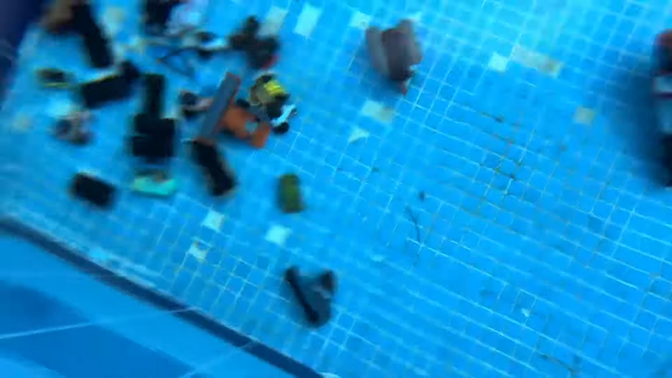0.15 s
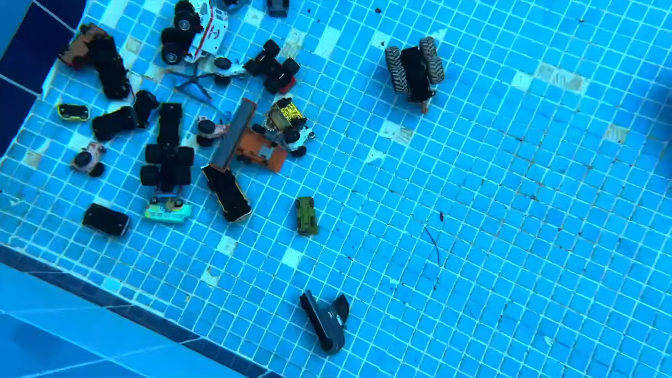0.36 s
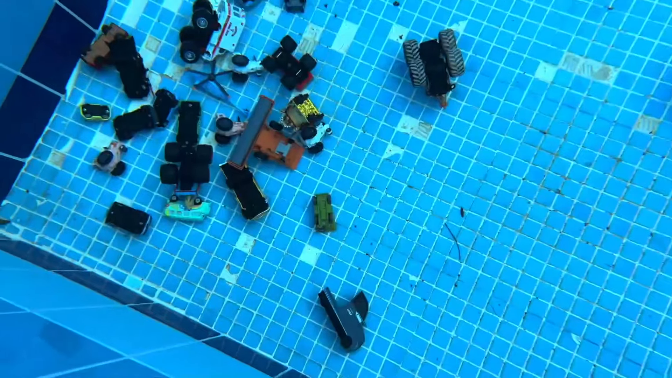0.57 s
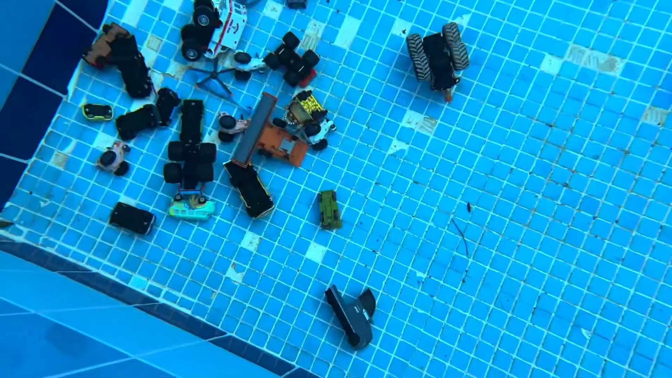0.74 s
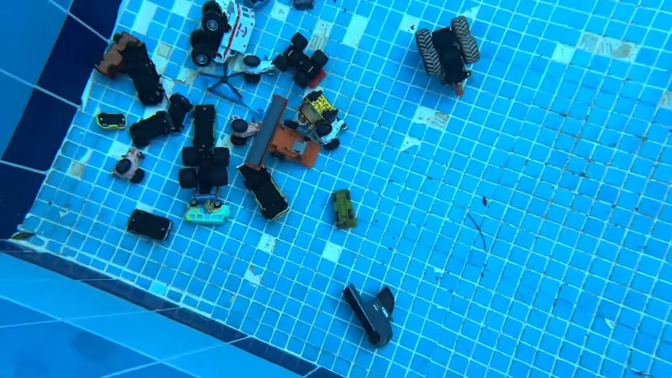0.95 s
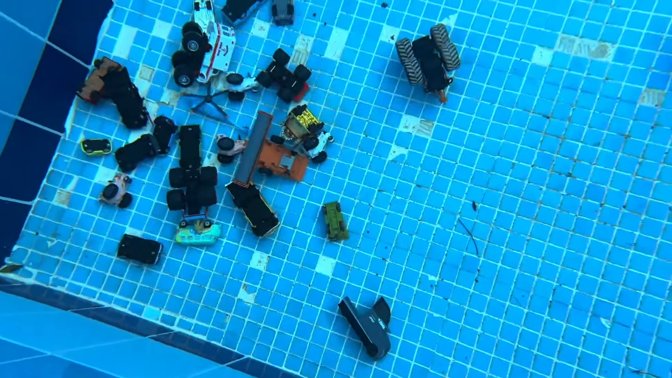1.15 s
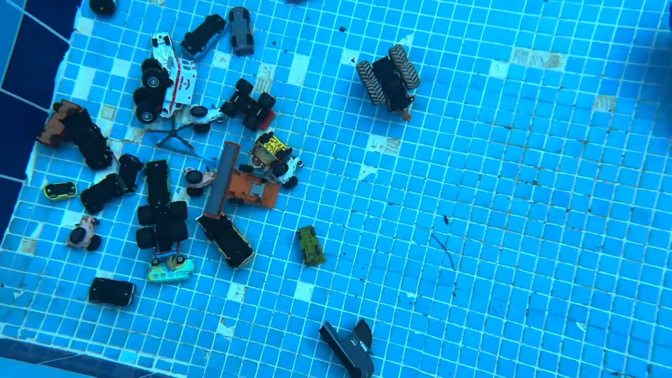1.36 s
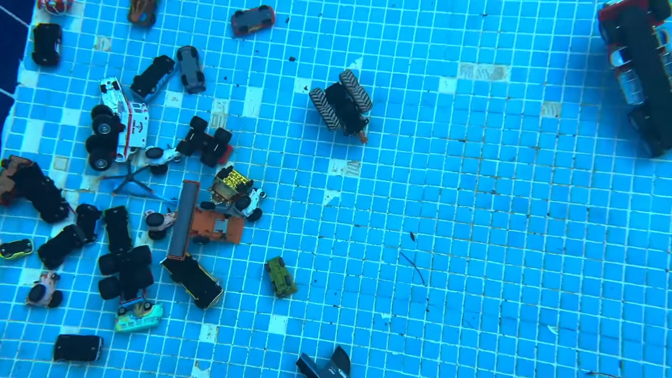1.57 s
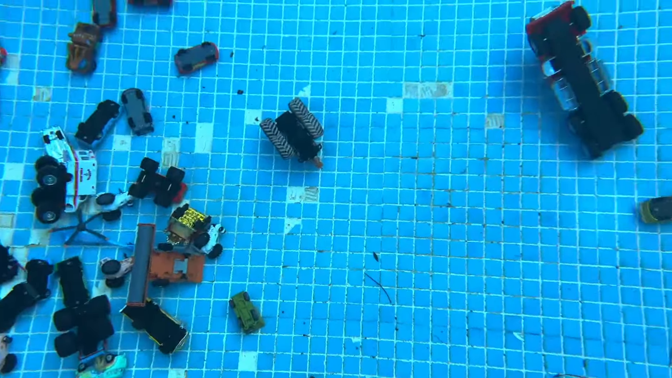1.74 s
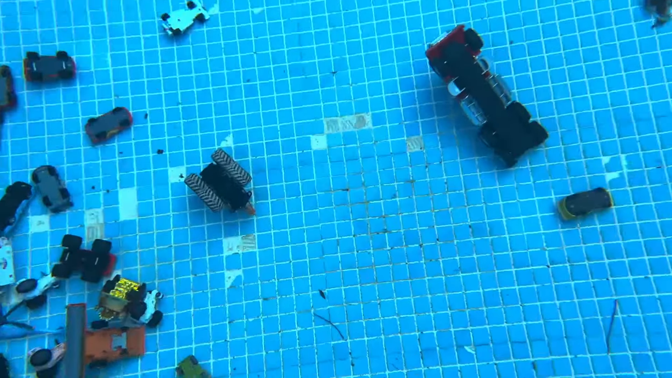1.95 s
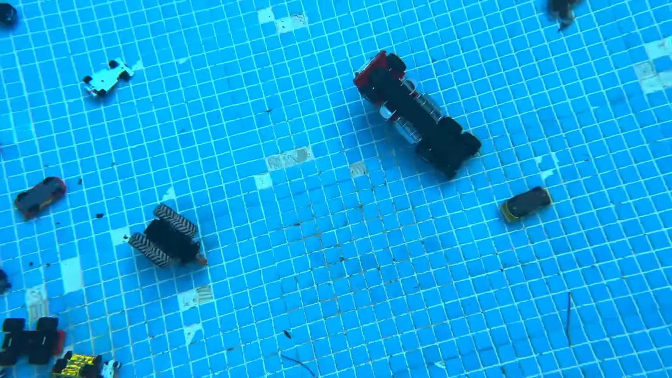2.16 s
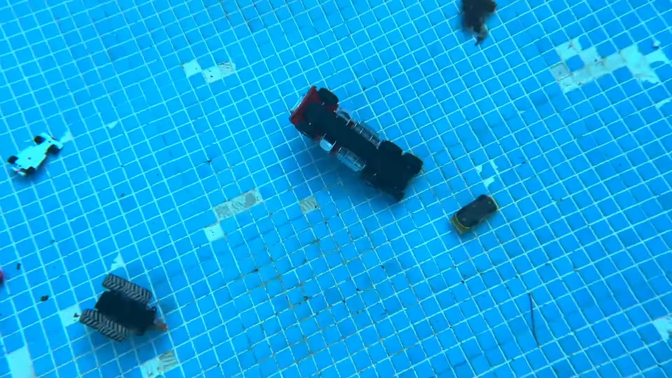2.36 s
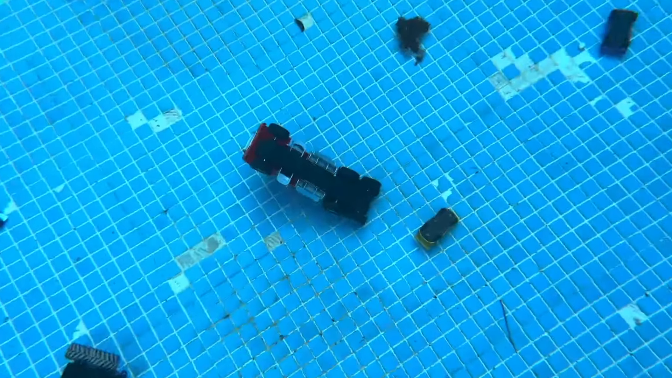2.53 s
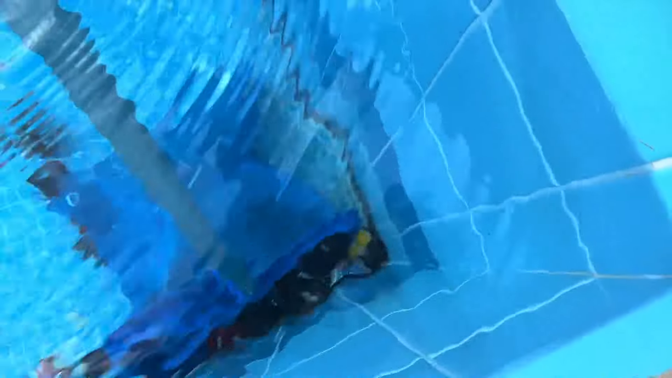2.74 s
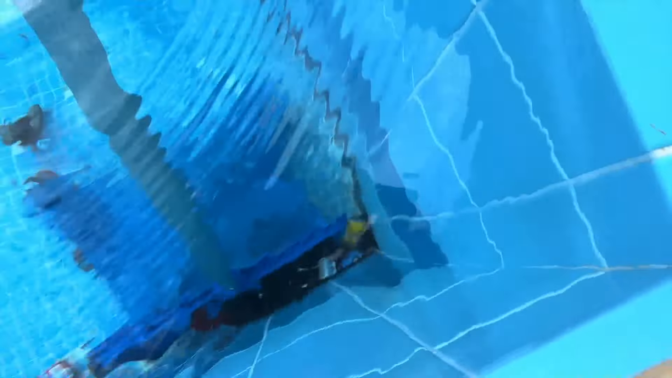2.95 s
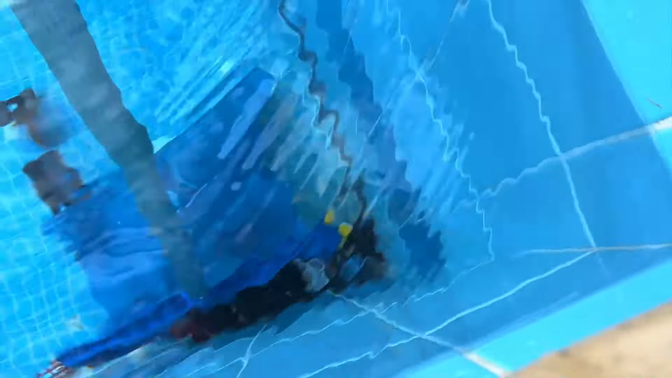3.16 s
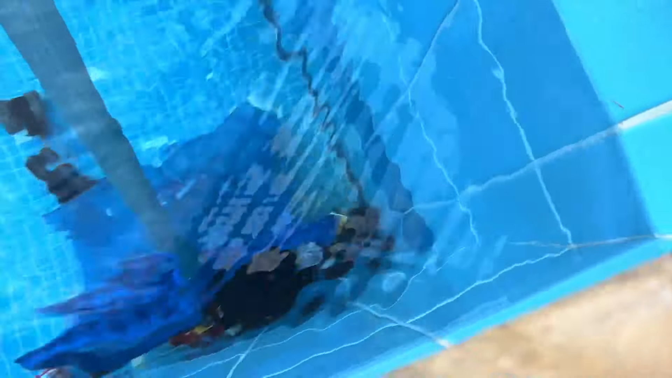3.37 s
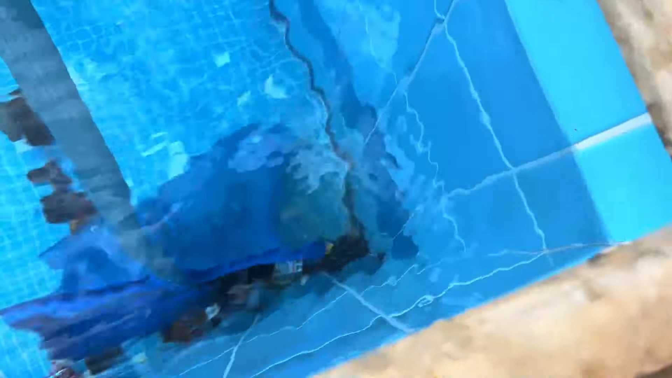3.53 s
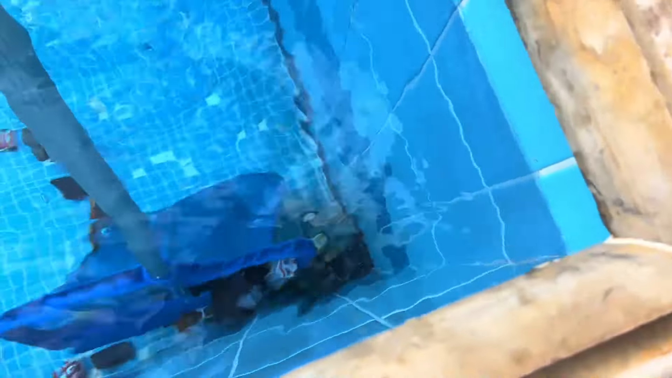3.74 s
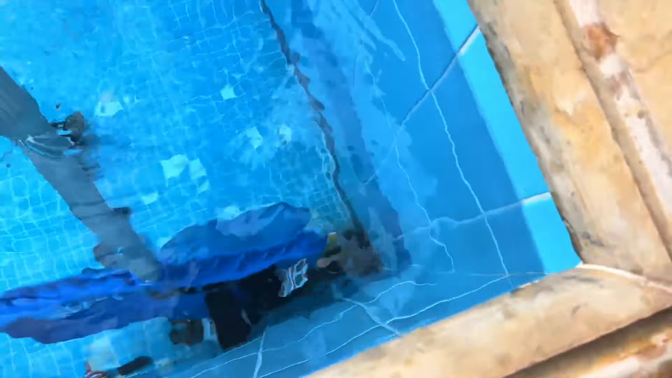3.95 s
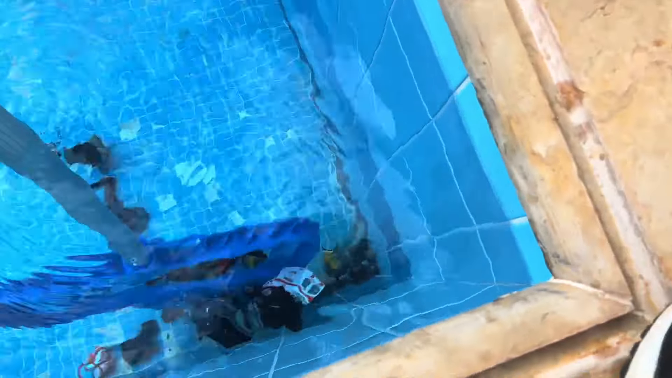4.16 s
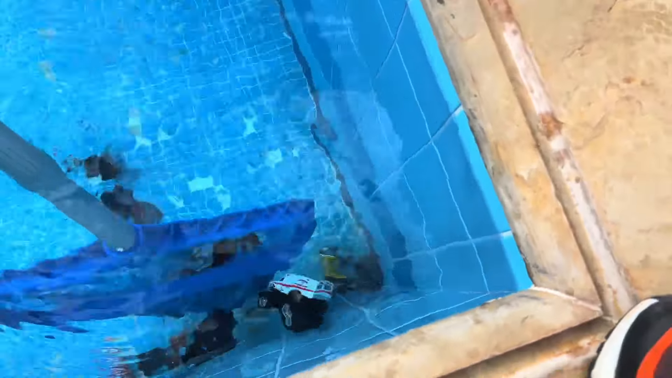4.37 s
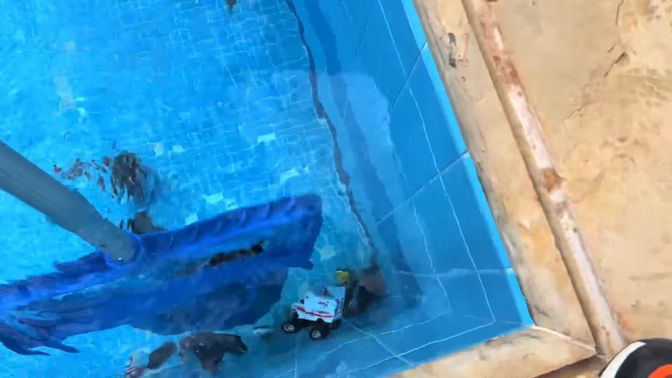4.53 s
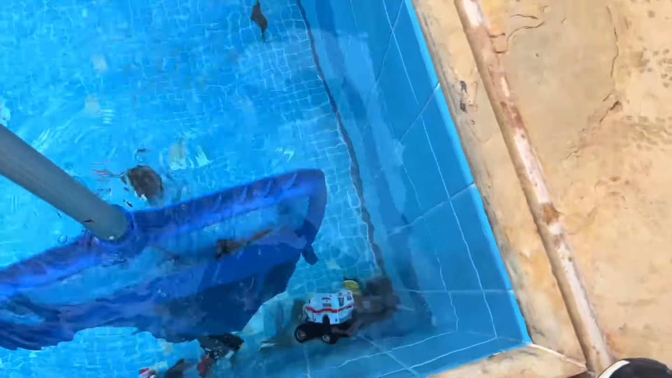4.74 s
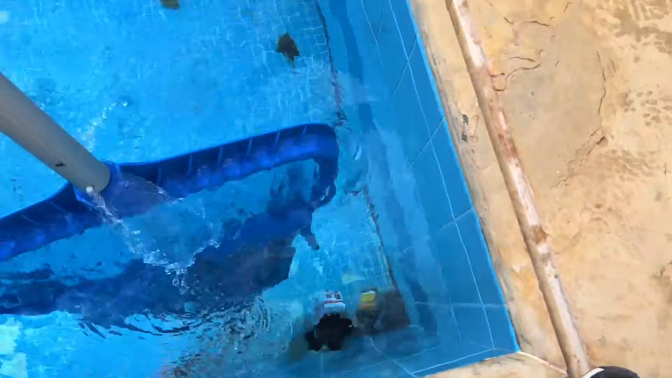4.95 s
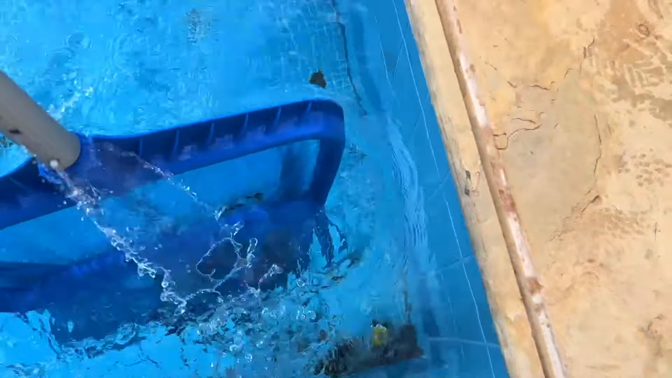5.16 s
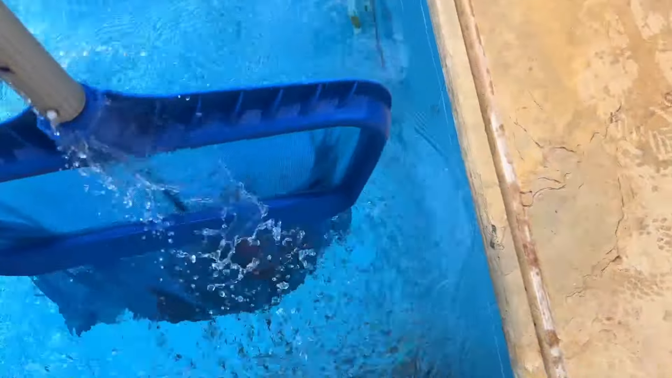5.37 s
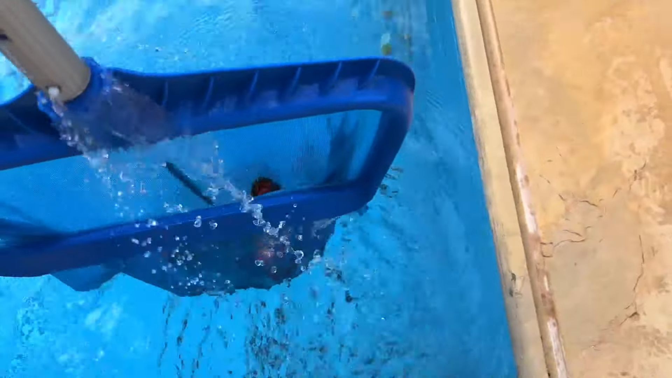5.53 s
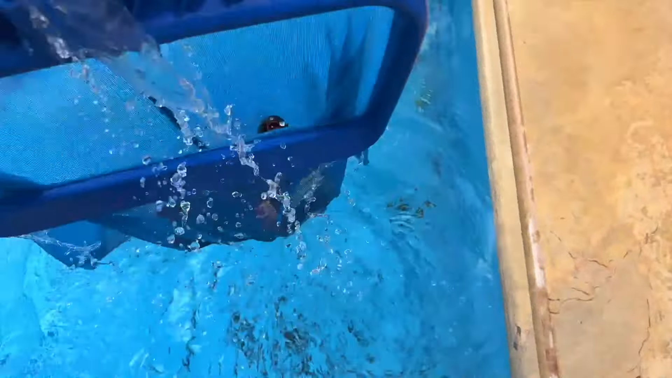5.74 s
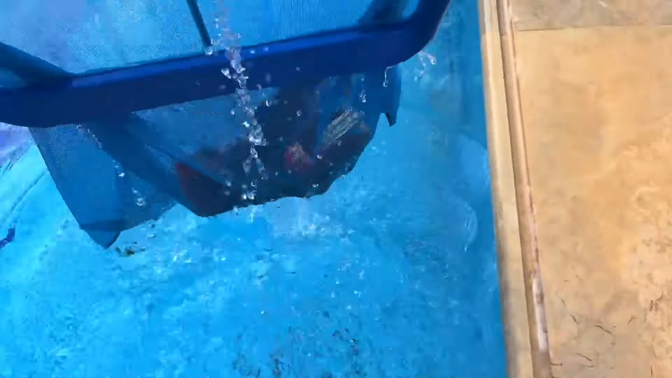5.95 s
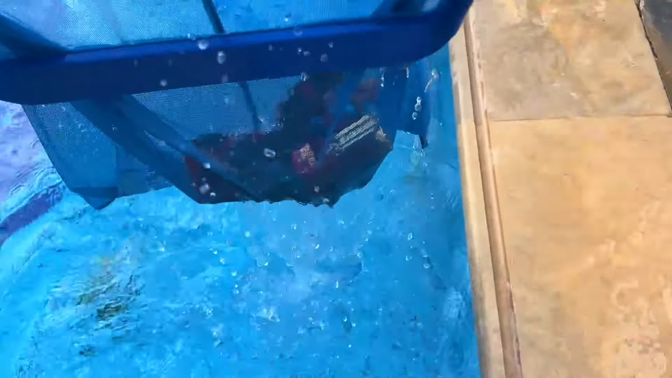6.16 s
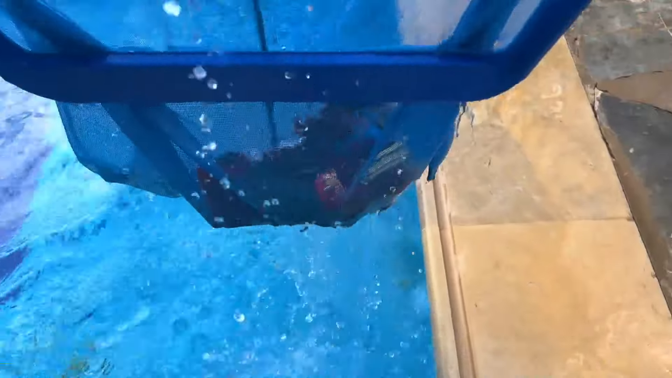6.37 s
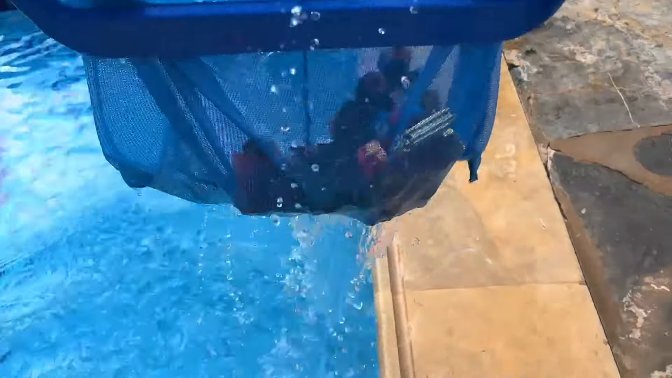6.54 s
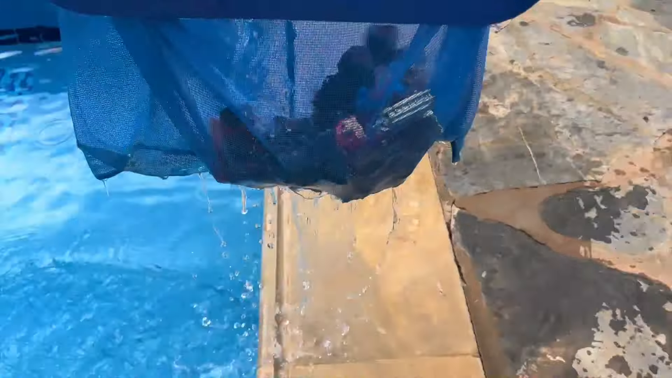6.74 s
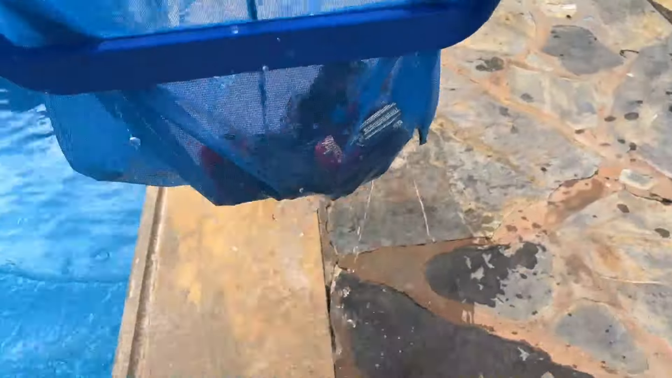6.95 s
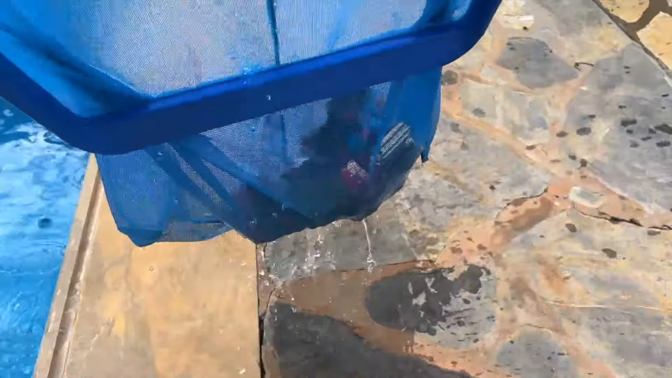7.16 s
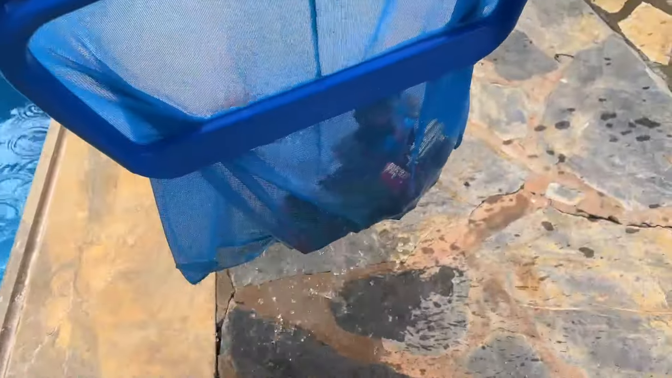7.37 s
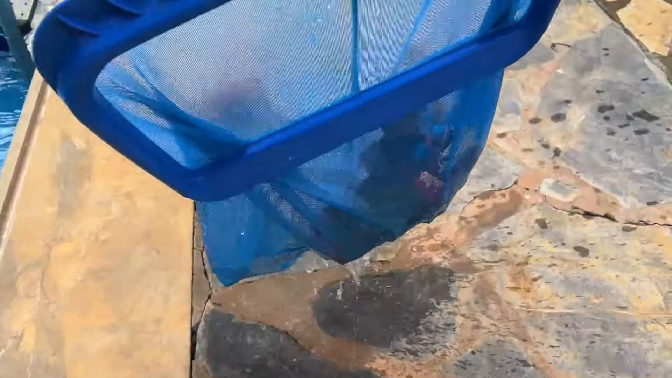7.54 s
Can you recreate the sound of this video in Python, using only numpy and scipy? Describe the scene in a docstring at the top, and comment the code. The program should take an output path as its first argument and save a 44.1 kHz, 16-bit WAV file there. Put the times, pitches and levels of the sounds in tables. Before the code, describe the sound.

A microphone plunges into a pool amid dull thumps and gurgles, surfaces to near quiet, then a dripping net pours bubbling, hissing water.

```python
"""A camera is plunged into a swimming pool: water churns round its case and knocks on it, dull and boomy,
as filtered noise, diving tones and damped resonances.
It returns to the air and a skimmer net full of toys is lifted out: water pours off the mesh into the pool,
then spatters on the stone edge, as bursts of noise for spray and drops and as decaying tones for bubbles."""
import sys
import numpy as np
from scipy import signal
from scipy.fft import rfft, irfft
from scipy.io import wavfile

SR = 44100
rng = np.random.default_rng(int(sys.argv[2]) if len(sys.argv) > 2 else 0)


def pcm_store(signal):
    """Save signal as 16-bit PCM."""
    levels = np.round(np.clip(np.atleast_2d(signal), -1, 1) * 32767)
    wavfile.write(sys.argv[1], SR, levels.astype(np.int16).T)


N = 335380
TIME = np.arange(N) / SR


def amp(db):
    """Logarithmic level: decibels to amplitude gain."""
    return 10 ** (np.asarray(db) / 20)


def unit(x):
    """Normalisation: scales to an rms of 1."""
    return x / np.sqrt(np.mean(x ** 2) + 1e-20)


def read(points, hz):
    """Interpolation of a spectrum on a log-frequency axis."""
    f, value = np.transpose(points)
    return np.interp(np.log(hz + 1), np.log(f), value)


def level(rows, axis=1, fade=0.0047):
    """Envelope: gain from one dB column, decaying exponentially beyond its ends."""
    rows = np.asarray(rows)
    outside = np.maximum(rows[0, 0] - TIME, 0) + np.maximum(TIME - rows[-1, 0], 0)
    return amp(np.interp(TIME, rows[:, 0], rows[:, axis])) * np.exp(-outside / fade)


def swells(rows):
    """Gaussian envelopes: the summed gain of one bell for each (t/s, level/dB, half length/s)."""
    return sum(amp(db) * np.exp(-((TIME - s) / half) ** 2) for s, db, half in rows)


def add(mix, s, sound):
    """Superposition: mixes a sound in at time s."""
    part = mix[:, max(round(s * SR), 0):][:, :sound.shape[-1]]
    part += sound[..., :part.shape[1]]


def band(x, hz, kind, order=2):
    """Butterworth filtering: a maximally flat passband."""
    return signal.sosfilt(signal.butter(order, hz, kind, fs=SR, output="sos"), x)


# correlation of the two channels: f/Hz, correlation (-1 to 1)
CHANNEL_CORRELATION = [(60, 1), (300, 1), (700, 0.075), (3000, 0.1), (15000, 0.14)]


def colour(x, points):
    """Spectral shaping and partial coherence of two independent channels; rms 1."""
    hz = np.fft.rfftfreq(N, 1 / SR)
    a, b = rfft(x)
    same = read(CHANNEL_CORRELATION, hz)
    pair = np.array([a, same * a + np.sqrt(1 - same ** 2) * b])
    return unit(irfft(pair * amp(read(points, hz)), N))


def waver(rate):
    """Random modulation: interpolated chance values, rate of them per second; rms 1."""
    return unit(np.interp(TIME * rate, np.arange(4096), rng.standard_normal(4096)))


def patter(rate, spread_db):
    """Poisson-like impacts: random instants, most of them small and a few large."""
    return (rng.random(N) < rate / SR) * amp(spread_db * np.minimum(rng.exponential(1, N), 3.5))


def bursts(rate, decay, spread_db, mist):
    """Shot noise: random droplets, each a decaying burst of hiss, over a steady fine mist."""
    impacts = patter(rate, spread_db) ** 2 / rate
    power = signal.lfilter([1], [1, -np.exp(-2 / (decay * SR))], impacts)
    return np.sqrt(power / power.mean() + mist ** 2) * rng.standard_normal((2, N))


def thump(dull_hz, length, sweep=23.14):
    """Dispersion: a blow heard as a thump whose highs arrive first, so its pitch dives."""
    t = np.arange(1, 4000) / SR
    hz = sweep / (2 * np.sqrt(t))
    swing = (1 - np.exp(-(2 * t * dull_hz) ** 2)) * np.exp(-(t / length) ** 2)  # a dull blow starts softly
    return np.sin(2 * np.pi * sweep * np.sqrt(t)) * swing / np.sqrt(1 + (hz / dull_hz) ** 4)


def bubble(hz, cycles, rise, burst=0.41):
    """Bubble resonance: a decaying tone, rising in pitch near the surface, where the bubble bursts."""
    turns = np.arange(int(5 * cycles * SR / hz)) * hz / SR
    climb = rise * turns / cycles
    envelope = np.exp(-turns / cycles - (climb / burst) ** 2) * (1 - np.exp(-turns))
    return np.sin(2 * np.pi * turns * (1 + climb)) * envelope


def place(sound, where, port_delay=0.0003876, shade_db=1.5):
    """Interaural-style cues: the channel on one side gets the sound sooner and, for positive shade, louder."""
    i = np.arange(len(sound))
    channels = []
    for side in (1, -1):
        shifted = np.interp(i + side * where * port_delay * SR, i, sound, left=0)
        channels.append(amp(shade_db * side * where) * shifted)
    return np.array(channels)


def crowd(count, pitches, cycles, rise, spread_db, start=4.6, end=N / SR):
    """Superposed bubble resonances of random pitch, strength and place; rms 1."""
    out = np.zeros((2, N))
    for when, size, strength, ring, where in rng.random((count, 5)):
        hz = np.interp(size, np.linspace(0, 1, len(pitches)), pitches)
        db = spread_db * min(-np.log(1 - strength), 4)
        tone = bubble(hz, cycles * (.5 + ring), rise)
        add(out, start + (end - start) * when, amp(db) * place(tone, 2 * where - 1, port_delay=0.000258))
    return unit(out)


# for a moment air clings to one microphone: it hears the knocks late
CLING_AT_S, CLING_WIDTH_S, CLING_DELAY_S = .78, .25, .00035


def clinging(s):
    """Gaussian envelope: how much air clings to the case at time s, 0-1."""
    return np.exp(-((s - CLING_AT_S) / CLING_WIDTH_S) ** 2)


# spectrum of the outdoor background: f/Hz, relative level/dB
AIR_SPECTRUM = [(300, 5.5), (700, 2), (1100, 4.5), (1900, 5.5), (3000, -8), (5000, -11.5), (6000, -23),
                (7500, -12), (12000, -40)]


def open_air():
    """Stationary noise and faint dripping, shut out while the microphone is under water."""
    above = np.interp(TIME, [.27, .285, 3.08, 3.3], [1, 0, 0, 1])
    background = colour(rng.standard_normal((2, N)), AIR_SPECTRUM)
    impacts = band(patter(220, 7) * rng.standard_normal((2, N)), 3500, "high")
    drip = rng.standard_normal((2, 300)) * np.exp(-np.arange(300) / 60)
    trickle = signal.oaconvolve(impacts, drip, axes=1)[:, :N]
    return above * (amp(-62.0) * background + amp(-75.5) * unit(trickle))


# water rushing past the case: t/s, upper resonance relative level/dB, lower resonance relative level/dB
RUSH_LEVELS = [(0.32, -66.5, -59), (0.75, -47, -62), (1.23, -50, -59.5), (1.51, -50, -51.5),
               (2.0, -49.5, -47.5), (2.39, -51.5, -49), (2.76, -54, -53), (3.45, -69.5, -70.5)]
# spectra of the two resonances: f/Hz, relative level/dB
UPPER_RESONANCE = [(600, -37), (950, -32.5), (1200, -7.5), (1600, 2), (2000, -11.5), (3000, -23),
                   (4500, -31.5), (6500, -39)]
LOWER_RESONANCE = [(250, 6), (600, 5), (850, 5.5), (1060, 15), (1350, -9), (2500, -55.5)]
# low rumble of water and handling: t/s, relative level/dB
RUMBLE_LEVELS = [(0.25, -60.5), (0.3, -47.5), (0.76, -35), (1.25, -46.5), (3.0, -42), (3.2, -54.5),
                 (4.6, -59.5), (5.0, -74.5), (6.4, -62.5), (7.6, -81)]
# spectrum of the rumble: f/Hz, relative level/dB
RUMBLE_SPECTRUM = [(15, -19), (30, -10.5), (50, 9), (70, 6.5), (110, -4.5), (170, -11), (300, -41.5),
                   (800, -84.5)]
# each sweep of the camera stirs up eddies: t/s, relative level/dB, half length/s
EDDY_SWEEPS = [(.725, -33.5, 0.032), (.885, -34, 0.032), (1.44, -44.5, 0.15), (1.96, -40.5, 0.085),
               (2.24, -34.5, 0.019), (2.5, -42, 0.096), (4.54, -63, 0.049)]
UPPER_RUSH_DB, LOWER_RUSH_DB, RUMBLE_DB = 2.5, 5.5, 3
IDLE_EDDIES_DB = -16  # eddies between sweeps, relative to the rumble gain
WIDE_NOISE_DB = -35  # level of the wide noise, opposite in the two channels, early in the dip


def submerged():
    """Turbulence noise: grainy rush through case resonances, eddy thumps, a wide band of noise and rumble."""
    out = np.zeros((2, N))
    resonances = [(UPPER_RESONANCE, UPPER_RUSH_DB), (LOWER_RESONANCE, LOWER_RUSH_DB)]
    for axis, (points, db) in enumerate(resonances, start=1):
        grains = rng.standard_normal((2, N)) * (1 + .5 * unit(patter(260, 1.9)))
        out += colour(grains, points) * level(RUSH_LEVELS, axis) * amp(db + 1.68 * waver(32.94))
    rumble_gain = level(RUMBLE_LEVELS, fade=10) * amp(RUMBLE_DB)
    blows = patter(420, 0.74) * rng.standard_normal((2, N))
    eddies, wide_noise = signal.oaconvolve(blows, thump(710, 0.0076)[None], axes=1)[:, :N]
    eddy_gain = swells(EDDY_SWEEPS) + rumble_gain * amp(IDLE_EDDIES_DB)
    out += unit(band(eddies, 190, "high", order=3)) * eddy_gain * amp(3.2 * waver(16))
    wide_noise = unit(band(wide_noise, [430, 1100], "band")) * clinging(TIME) * amp(WIDE_NOISE_DB)
    out += np.outer([1, -1], wide_noise)  # the wide noise is added with opposite signs left and right
    rumble = colour(rng.standard_normal((2, N)), RUMBLE_SPECTRUM)
    return out + rumble * rumble_gain * amp(2.8 * waver(13))


# pockets of air escape from the case: t/s, relative level/dB, half length/s, f at centre/Hz
AIR_ESCAPES = [(0.069, -50.5, 0.013, 930), (0.379, -43, 0.02, 950), (0.561, -38.5, 0.028, 1400),
               (0.695, -36, 0.0089, 1400), (2.277, -39, .03, 1050)]


def gurgles(glide=-4.0, flutter_hz=330):
    """Modulated resonance: escaping air, heard as fuzzy tones that swell and sink in pitch."""
    out = np.zeros((2, N))
    for s, db, half, hz in AIR_ESCAPES:
        turns = np.cumsum(hz * np.exp(glide * np.clip(TIME - s, -.2, .2))) / SR
        opposite = np.outer([1, -1], clinging(s) * waver(flutter_hz))
        flutter = waver(flutter_hz) + opposite
        out += swells([(s, db, half)]) * flutter * np.sin(2 * np.pi * turns)
    return out


# water slaps the case as it breaks the surface: t/s, relative level/dB, decay to 1/e /s
SURFACE_SLAPS = [(0.183, -37, 0.00065), (0.2206, -38.5, 0.03), (0.2274, -12, 0.0021),
                 (0.265, -14.5, 0.0017), (.269, -13, 0.0034), (0.275, -13.5, 0.00075),
                 (0.2784, -10, 0.00075)]
SEALED_S = .268
# slaps are bright in the open; once water seals the microphone they are duller and shake the air trapped there
OPEN_HZ, SEALED_HZ, TRAPPED_AIR_DB = 12030, 6550, 11.5


def plunge(apart=0.68):
    """Impulsive noise: sharp slaps of water, the last ones exciting the resonance of trapped air."""
    out, t = np.zeros((2, N)), np.arange(3000) / SR
    air = np.sin(2 * np.pi * 1080 * t) * np.exp(-t / 0.00087)
    air += 0.15 * np.sin(2 * np.pi * 420 * t) * np.exp(-t / 0.0053)
    for s, db, decay in SURFACE_SLAPS:
        sealed = s > SEALED_S
        noise = rng.standard_normal(len(t)) + apart * rng.standard_normal((2, len(t)))
        slap = noise * np.exp(-t / decay)
        slap = 0.24 * band(slap, 1500, "high") + 1.6 * band(slap, [1700, 3200], "band", order=1)
        slap = band(slap, SEALED_HZ if sealed else OPEN_HZ, "low")
        add(out, s, amp(db) * (slap + sealed * amp(TRAPPED_AIR_DB) * air))
    return out


# water knocks on the case: t/s, relative level/dB, f above which it is dull/Hz
WATER_KNOCKS = [(0.28, -18.5, 267), (.453, -35.5, 700), (0.496, -29.5, 700), (0.519, -29.5, 400),
                (0.709, -19.5, 460), (0.7167, -15, 1100), (0.861, -15.5, 450), (0.883, -17, 500),
                (1.377, -28.5, 520), (1.414, -21.5, 230), (1.538, -29, 420), (2.037, -27, 380),
                (2.239, -24, 605), (1.588, -14, 1430), (1.769, -30, 1110), (1.807, -29, 1100),
                (2.223, -22.5, 178), (2.3972, -11.5, 850), (2.554, -24, 450), (2.799, -17, 127),
                (3.468, -32, 175), (3.541, -40.5, 502), (3.723, -49, 278), (3.895, -46.5, 385),
                (4.846, -41, 200), (5.106, -42.5, 250), (5.631, -36, 350), (6.605, -37.5, 221)]
# hard ticks heard under water: t/s, ring relative level/dB, treble click relative level/dB
HARD_TICKS = [(0.374, -37.5, -77), (0.59, -28, -67), (0.602, -24.5, -62), (0.6756, -21.5, -62),
              (0.8032, -14, -26.5), (0.8598, -22, -38), (0.922, -26.5, -67), (1.5882, -22, -21.5),
              (1.767, -31, -65), (1.8076, -30, -70), (2.396, -25, -39), (2.4913, -30.5, -68),
              (2.552, -31, -64)]
# modes of the flooded case: nominal f/Hz, relative level/dB, decay by 60 dB /s
CASE_MODES = [(1197, -2, 0.04), (1535, 1.5, 0.021), (2240, -24.5, 0.015), (4650, -3.5, 0.0012),
              (4620, -13.5, 0.0064)]
# a knock at 0 dB lasts KNOCK_S; softer ones are shorter, by half for every KNOCK_HALVING_DB
KNOCK_S, KNOCK_HALVING_DB = 0.038, 33
# sharp knocks also ring a pocket of air in the case; knocks duller than its pitch hardly reach it
POCKET_HZ, POCKET_DECAY_S, POCKET_DB = 607, 0.004, -4
CLING_RING_DB = 6.5  # the clinging air swells the ring of the pocket
TICK_RING_DB, TICK_CLICK_DB = -3.5, 16


def knocks():
    """Modal excitation: diving thumps that ring pocketed air, and ticks that ring the case."""
    out, t = np.zeros((2, N)), np.arange(2000) / SR
    for s, db, dull_hz in WATER_KNOCKS:
        blow = thump(dull_hz, KNOCK_S * 2 ** (db / KNOCK_HALVING_DB))
        cling = clinging(s)
        add(out, s, amp(db) * place(blow, -cling, port_delay=CLING_DELAY_S, shade_db=0.0))
        pocket = np.sin(2 * np.pi * POCKET_HZ * rng.uniform(0.76, 1.15) * t) * np.exp(-t / POCKET_DECAY_S)
        pocket /= 1 + (POCKET_HZ / dull_hz) ** 3
        pocket_gain = amp(db + POCKET_DB + CLING_RING_DB * cling)
        add(out, s, pocket_gain * place(pocket, -cling, port_delay=CLING_DELAY_S, shade_db=-2.5))
    for s, ring_db, click_db in HARD_TICKS:
        ring = np.zeros(len(t))
        for hz, mode_db, t60 in CASE_MODES:
            strike_db = click_db + TICK_CLICK_DB if hz > 3000 else ring_db + TICK_RING_DB
            tone = np.sin(2 * np.pi * hz * rng.uniform(0.885, 1.073) * t)
            ring += amp(mode_db + strike_db - 60 * t / t60) * tone
        ring = band(ring, [800, 6000], "band", order=8)
        add(out, s, place(ring, rng.uniform(-0.099, 1), port_delay=.00005))
    return out


def fizz():
    """Shot noise: tiny bubbles crackle off the case while air clings to it."""
    crackle = unit(band(bursts(98, 0.0036, 4.5, 0.079), [3000, 5500], "band"))
    return crackle * swells([(CLING_AT_S, -55.5, .1)])


# single drops slapping water, frame and stone: t/s, crack relative level/dB, dull slap relative level/dB
SINGLE_DROPS = [(3.6173, -47, -49), (4.1612, -46, -44), (4.224, -31, -47.5), (4.2875, -36.5, -58),
                (4.385, -46.5, -47), (5.3463, -16.5, -39), (5.7997, -19.5, -61), (5.8514, -21, -41),
                (6.6182, -19.5, -38), (6.708, -22.5, -49), (6.894, -29.5, -62), (7.216, -28.5, -67),
                (6.8215, -23, -65), (7.004, -28, -67), (6.9317, -23.5, -40.5), (6.9777, -24.5, -61),
                (6.983, -29, -66), (7.185, -28.5, -73), (7.3456, -27.5, -70), (7.499, -26.5, -65)]
CRACK_DB, SLAP_DB = -1.5, 0


def drops():
    """Impact noise: each single drop gives a bright crack and a duller slap."""
    out, t = np.zeros((2, N)), np.arange(1500) / SR
    for s, crack_db, slap_db in SINGLE_DROPS:
        slap, crack = rng.standard_normal((2, 2, len(t)))
        slap = unit(band(slap, [450, 2600], "band")) * np.exp(-t / 0.0085)
        crack_decay = np.exp(-t / 0.000094) + 0.65 * np.exp(-t / 0.0032)
        crack = unit(band(crack, 3600, "high")) * crack_decay
        add(out, s, slap * amp(slap_db + SLAP_DB) + crack * amp(crack_db + CRACK_DB))
    return out


# water falling from the net: t/s, fine spray relative level/dB, splashing relative level/dB
POUR_LEVELS = [(4.7, -60.5, -67.5), (4.93, -52, -58.5), (5.35, -46, -45.5), (5.95, -43.5, -41),
               (6.27, -45, -41), (6.55, -44.5, -39.5), (6.73, -45, -47.5), (7.03, -45, -74.5),
               (7.28, -52.5, -69), (7.6, -48.5, -59.5)]
# water slops off the net, gently at the surface, then in lumps from the mesh: t/s, level/dB, half length/s
NET_SLOPS = [(3.9, -65, 0.097), (4.16, -67, 0.061), (4.45, -63, 0.38), (5.63, -30.5, 0.013),
             (5.93, -38.5, 0.031)]
SPRAY_DB, SPLASH_DB = 2.5, 0.5


def splashing():
    """Envelope of impact strength: how hard water hits the pool, from the steady pour and its slops."""
    return level(POUR_LEVELS, axis=2) * amp(SPLASH_DB) + swells(NET_SLOPS)


# spectrum of the spray: f/Hz, relative level/dB
SPRAY_SPECTRUM = [(200, -9.5), (600, -63.5), (1200, -8), (2400, -0.5), (3600, 3.5), (4700, 8.5),
                  (5800, -4.5), (8300, 8), (10000, -8), (11500, 8.5), (16000, 1.5)]
# spectrum of the splashes: f/Hz, relative level/dB
SPLASH_SPECTRUM = [(150, -6), (450, -2), (720, -9), (1020, -0.5), (1600, 2), (2350, 5), (3400, 7),
                   (6000, -13)]
# pitches of the fine droplets, at even steps of a random draw: f/Hz
DROPLET_HZ = [3070, 4820, 8000, 7840, 12400, 14400]
# as the net swings over the stone edge, the drops spatter and ping less: t/s, relative level of pings/dB
STONE_EDGE = [(6.65, 0.5), (6.95, -8)]
# at FULL_POUR_DB the spray has FULL_DROPS_PER_S; the rate thins tenfold per DROP_THINNING_DB, within limits
FULL_POUR_DB, FULL_DROPS_PER_S, DROP_THINNING_DB = -36, 1500, 31


def spray(fine_hz=6300):
    """Shot noise: hissing droplet bursts, pings and duller splashes, sparser when splashing weakens."""
    heaviness = np.clip(splashing() / amp(FULL_POUR_DB), .06, 1.5)
    rate = FULL_DROPS_PER_S * heaviness ** (20 / DROP_THINNING_DB)
    # coarse and fine droplets fall independently
    coarse, fine = [band(bursts(rate, 0.0024, 7.6, 0.43), fine_hz, kind, order=4) for kind in ("low", "high")]
    hiss = colour(coarse + fine, SPRAY_SPECTRUM) * amp(1.5)
    pings = crowd(count=3600, pitches=DROPLET_HZ, cycles=8.95, rise=0.061, spread_db=6.0) * amp(-6.5)
    pings = pings * amp(np.interp(TIME, *np.transpose(STONE_EDGE)))
    splash = colour(bursts(rate * 0.4, 0.0031, 5.4, 0.59), SPLASH_SPECTRUM)
    return (hiss + pings) * level(POUR_LEVELS) * amp(SPRAY_DB) + splash * splashing()


# while the net clears the surface, separate streams plop into the pool: f/Hz
PLOP_PITCHES = [840, 1090, 1463, 2236, 2860, 4070]
# the hollow dug by the stream froths with bubbles, most of like size: f/Hz
FROTH_PITCHES = [1005, 1960, 2165, 2425, 2820]
# pitches of the bubbles in the crowd, at even steps of a random draw: f/Hz
CROWD_BUBBLE_HZ = [565, 1042, 1370, 2087, 2330, 2680, 4300]
HOLLOW_START_S, HOLLOW_LENGTH_S = 5.87, .64


def bubbling():
    """Bubble resonance in numbers: a crowd of bubbles under the falling water, plops and froth."""
    bubbles = crowd(count=2400, pitches=CROWD_BUBBLE_HZ, cycles=8.0, rise=0.048, spread_db=6.0)
    plops = crowd(count=400, pitches=PLOP_PITCHES, cycles=10.7, rise=0.0236, spread_db=5.0,
                  start=5.02, end=5.75)
    froth = crowd(count=700, pitches=FROTH_PITCHES, cycles=7.6, rise=0.0333, spread_db=1.5,
                  start=HOLLOW_START_S, end=HOLLOW_START_S + HOLLOW_LENGTH_S)
    return bubbles * splashing() * amp(-10.0) + plops * amp(-62) + froth * amp(-52.5)


# the loudest single bubbles; those closest to the surface chirp upward:
# t/s, relative level/dB, starting f/Hz, rise (0-1)
LOUD_BUBBLES = [(5.019, -27.5, 4000, 0.07), (5.047, -37, 846, 0), (5.064, -22, 2990, 0.12),
                (5.101, -28, 2166, 0.1), (5.203, -36.5, 880, 0.04), (5.253, -21.5, 2730, 0.23),
                (5.294, -27.5, 2040, 0.17), (5.425, -20, 3140, 0.13), (5.434, -22, 1960, .09),
                (5.486, -20.5, 2130, .014), (5.388, -23.5, 2930, 0.1), (5.934, -16, 2160, .08),
                (6.157, -17.5, 2190, .12), (6.448, -18.5, 2020, 0.04), (6.729, -33, 1270, 0.05),
                (6.912, -32.5, 1770, 0.03), (7.062, -25, 2360, 0.6), (7.551, -42.5, 1460, .06)]
BUBBLE_DB = -3.5


def plinks():
    """Bubble resonance: loud clear bubbles at the surface."""
    out = np.zeros((2, N))
    for s, db, hz, rise in LOUD_BUBBLES:
        tone = place(bubble(hz, 10.4, rise), rng.uniform(-0.37, 1.0), port_delay=0.00005)
        add(out, s, amp(db + BUBBLE_DB) * tone)
    return out


# the thick stream digs a hollow that deepens and closes again; the deeper it is, the lower and quieter it gulps
SHALLOW_HZ, DEEP_HZ, SHALLOW_DB, DEEP_DB = 464, 193.4, -40, -48.5
# the stream moves on before the hollow has quite closed: share of the whole arch that is heard
HOLLOW_ARCH, HOLLOW_SHAPE = 0.91, 0.663


def gulps(count=60):
    """Resonance falling with size: big slow bubbles in the hollow, with smaller ones splitting off."""
    out = np.zeros((2, N))
    for k, (late, size) in enumerate(rng.random((count, 2))):
        progress = (k + late) / count
        depth = np.sin(np.pi * progress * HOLLOW_ARCH) ** HOLLOW_SHAPE
        smaller = 1 + 1.73 * size ** 3
        hz = SHALLOW_HZ * (DEEP_HZ / SHALLOW_HZ) ** depth * smaller
        db = SHALLOW_DB + (DEEP_DB - SHALLOW_DB) * depth
        gulp = amp(db) * bubble(hz, 9.4, 0.011) / smaller
        add(out, HOLLOW_START_S + HOLLOW_LENGTH_S * progress, gulp)
    return out


# level of the net, left over right: f/Hz, level difference/dB
LEFT_OVER_RIGHT = [(600, -5.5), (950, 9.5), (1700, 0.5), (2400, 0.5), (4900, 7), (6000, -0.3)]


def ports(x, lag=.00015, scatter_db=-10):
    """Direct and scattered sound: the net is heard later on the left, with a weaker scattered part."""
    hz = np.fft.rfftfreq(N, 1 / SR)
    direct, scattered = rfft(x) * amp([[0], [scatter_db]])
    late = np.exp(-2j * np.pi * hz * lag * np.clip((hz - 2000) / 800, .1, 1))
    pair = np.array([(direct + scattered) * late, direct - scattered])
    return irfft(pair * amp(np.outer([.5, -.5], read(LEFT_OVER_RIGHT, hz))), N)


def poolside(x, t60=0.11, wet_db=-12):
    """Reverberation: brief reflections from the pool walls and paving, as decaying noise."""
    t = np.arange(8000) / SR
    tail = rng.standard_normal((2, len(t))) * amp(-60 * t / t60) * (t > .003)
    return x + amp(wet_db) * signal.oaconvolve(x, tail / np.linalg.norm(tail[0]), axes=1)[:, :N]


def scene():
    """Superposition of the dip under water and the dripping net."""
    flooded = submerged() + gurgles() + knocks() + fizz()
    flooded = band(flooded, 6570, "low", order=8)  # water in the port shuts out the treble
    net = poolside(ports(drops() + spray() + bubbling() + gulps()) + plinks())
    return open_air() + flooded + plunge() + net


def record(dry):
    """Saturation and band limiting: the loudest peaks are softly clipped, then low-passed."""
    clipped = dry / (1 + (dry / .49) ** 8) ** (1 / 8)
    lowpass = signal.firwin(255, 16100, window=("kaiser", 9), fs=SR)  # edge in Hz
    return signal.oaconvolve(clipped, lowpass[None], "same")


dry = scene()
out = record(dry)
pcm_store(out)
```